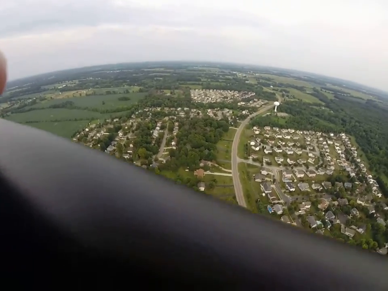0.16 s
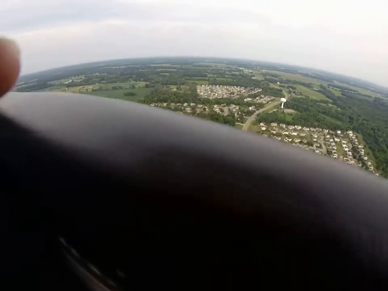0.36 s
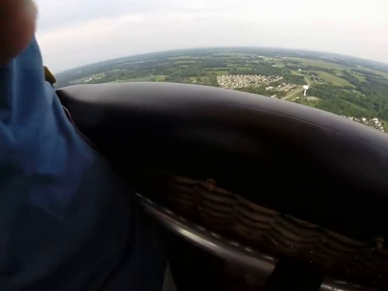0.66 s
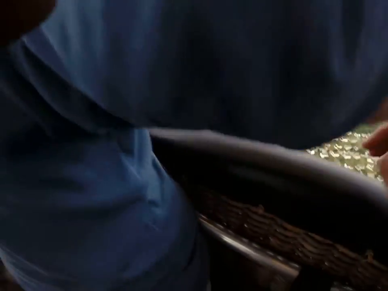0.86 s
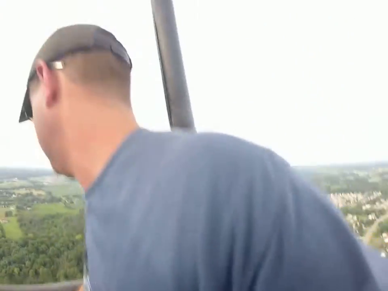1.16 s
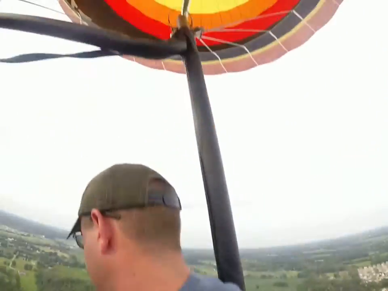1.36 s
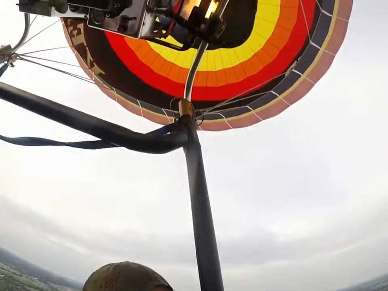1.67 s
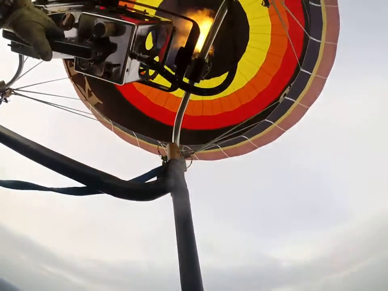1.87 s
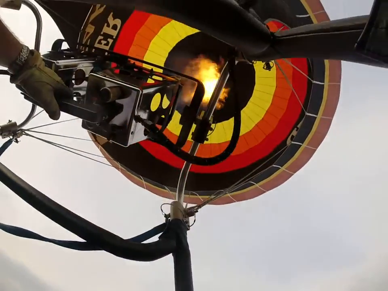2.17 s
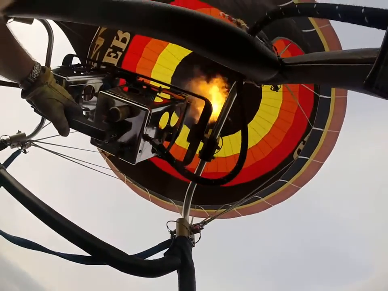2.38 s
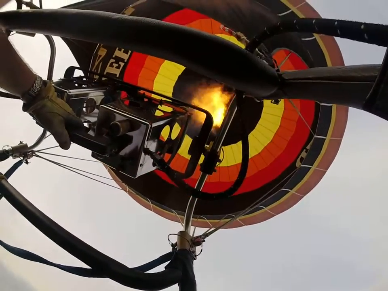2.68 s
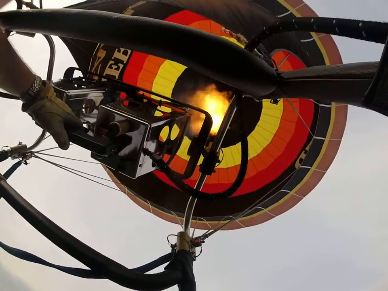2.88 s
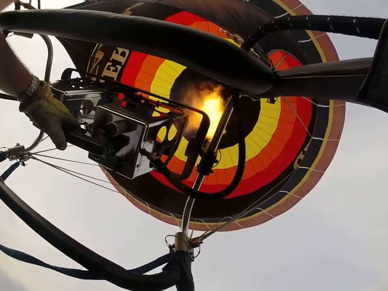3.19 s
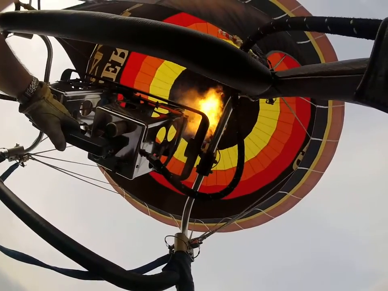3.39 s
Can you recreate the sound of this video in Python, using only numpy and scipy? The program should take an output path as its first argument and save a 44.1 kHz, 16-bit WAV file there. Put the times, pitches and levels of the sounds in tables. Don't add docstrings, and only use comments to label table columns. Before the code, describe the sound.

Hot-air balloon burner roars steadily, hiss growing over low rumble, with a few sharp handling knocks

```python
import sys
import numpy as np
from scipy import signal
from scipy.io import wavfile
from scipy.ndimage import uniform_filter1d

SR = 44100
rng = np.random.default_rng(int(sys.argv[2]) if len(sys.argv) > 2 else 0)


def file_out(sig):
    cols = np.atleast_2d(sig).T
    lim = np.clip(cols, -1, 1)
    pcm = np.round(lim * 32767).astype(np.int16)
    wavfile.write(sys.argv[1], SR, pcm)


def voltage_ratio(level):
    return 10 ** (np.asarray(level, float) / 20)


N = 156114

# (time [s], jet level [dB], pose [0 rim, 1 pilot, 2 tilting up, 3 under burner],
# closeness of basket and pilot [0-1], basket echo dip [Hz])
TURN = [(0, -27.5, 0.22, 0.83, 850), (.2, -28, 0.17, 0.78, 870), (.4, -28, .01, 0.6, 960),
        (.52, -28.5, 0.6, 0.69, 920), (.7, -25.5, 0.78, 0.83, 890), (.86, -24.5, 1.13, 1, 795),
        (1.0, -21.5, 1.47, 1, 820), (1.09, -20.5, 1.4, .6, 720), (1.2, -22.5, 2.4, 0.7, 694),
        (1.35, -22.5, 1.74, 0.39, 660), (1.7, -19, 1.91, 0.34, 583), (2.0, -17.5, 2.56, 0.36, 583),
        (2.2, -15.5, 2.8, 0.04, 570), (2.38, -15.5, 2.8, 0, 537), (2.62, -16, 4, 0.06, 555),
        (2.9, -15.5, 3.3, 0, 560), (3.2, -17, 2.72, 0.08, 550), (3.54, -15, 2.84, .3, 550)]


def jet():
    # (frequency [Hz], level [dB per Hz])
    from_rim = [(600, -9), (1800, -11.5), (3000, -13), (4500, -8), (7000, -7), (8300, -22), (11000, -17.5),
                (15500, -30)]
    beside_pilot = [(600, -28), (1800, -14), (3000, -4), (4500, -3.5), (7000, -4), (8500, -9.5),
                    (11000, -12), (15500, -20)]
    tilting_up = [(600, -22.5), (1700, -16), (2800, -17), (4300, -5.5), (6800, -8.5), (7800, -19.5),
                  (11000, -17), (15500, -28.5)]
    under_burner = [(600, -20), (1700, -23), (2700, -14), (4300, -7), (6500, -9.5), (7200, -16.5),
                    (11000, -20), (15500, -33.5)]
    t, hz = grid(size=1024)
    views = np.hstack([read(view, hz) for view in (from_rim, beside_pilot, tilting_up, under_burner)])
    field = views @ poses(t) + housing(t, hz)
    field = field - 40 * (hz < 200)
    level_db = curve(TURN, np.arange(N) / SR)[0]
    return voltage_ratio(level_db) * noise(field, patchy_db=1.26, flicker_db=0.57)


def flame():
    # (time [s], level [dB])
    swell = [(0, -26), (.25, -22), (.45, -22.5), (.65, -19.5), (.82, -20), (.93, -21.5), (1.03, -19),
             (1.2, -24.5), (1.4, -21), (1.6, -23), (1.8, -20), (2.06, -18.5), (2.2, -19.5), (2.5, -22.5),
             (2.8, -20.5), (3.12, -23.5), (3.26, -19.5), (3.54, -23.5)]
    # (frequency [Hz], level [dB per Hz])
    rumble = [(8.8, -50), (15, -14.5), (69, -5), (162, -1), (306, -12), (345, -13.5), (389, -29.5),
              (439, -27.5), (560, -66), (730, -64), (1230, -120)]
    shelter_db, shelter_hz = -4.5, 117
    t, hz = grid(size=2048)
    _, _, close, dip_hz = curve(TURN, t)
    field = read(rumble + [(1500, -71)], hz) + dip(hz, dip_hz)
    field = field + shelter_db * close * bump(hz, 0, 2 * shelter_hz)
    level_db = curve(swell, np.arange(N) / SR)[0]
    return voltage_ratio(level_db) * noise(field, patchy_db=.2, flicker_db=0.32)


def basket():
    # (frequency [Hz], level [dB per Hz])
    reflected = [(300, -1.5), (500, -4), (850, -12.5), (1300, -9.5), (1750, -17), (2300, -18), (3300, -25),
                 (6000, -60)]
    t, hz = grid(size=1024)
    field = read([(100, -45)] + reflected + [(15000, -60)], hz) + housing(t, hz)
    close = np.clip(curve(TURN, np.arange(N) / SR)[2], 0, 2)
    return voltage_ratio(-28) * close * noise(field, patchy_db=.4, flicker_db=0.7)


def ticks():
    tick_times = [.446, .6388, .6742, .8771, 1.0535, 1.1152]
    # (peak [dB], pitch [Hz], brightness [dB per octave], rise [s], 60 dB ring time [s])
    touches = [
        (-15, 2300, -3, 0.00039, .003),
        (-11, 990, -25, .0007, .016),
        (-6, 1950, -1, .0005, .0045),
        (2.5, 1420, -1, .0005, .0065),
        (-15, 1300, -14, .0005, .006),
        (1, 1320, -15, 0.00012, 0.0026),
    ]
    # (multiple of pitch, level [dB], share of ring time)
    shell = [(1, 0, 1), (1.7, -1, .9), (2.4, -9, .7), (3.2, -14, .6), (4.0, -7, .7), (4.7, -13, .6)]
    bounce_s, bounce = .0011, .3
    out, t = np.zeros(N), np.arange(600) / SR
    for s, (db, hz, bright_db, rise, t60) in zip(tick_times, touches):
        ring = np.zeros(len(t))
        for m, mode_db, share in shell:
            fade_db = mode_db + bright_db * np.log2(m) - 60 * t / (t60 * share)
            onset = 1 - np.exp(-(t * m / rise) ** 2)
            ring = ring + voltage_ratio(fade_db) * np.sin(2 * np.pi * hz * m * t) * onset
        ring = ring - bounce * np.interp(t - bounce_s, t, ring, left=0)
        out[round(s * SR):][:len(t)] += voltage_ratio(db) * ring / abs(ring).max()
    return out


def housing(t, hz):
    # (centre [Hz], width [Hz], lift [dB] at rim, by pilot, tilting up, under burner)
    resonances = [(1194, 226, 8, -3.5, 5.5, 5), (2250, 520, 6, 3, 10.5, 1),
                  (2560, 310, 0.5, -0.5, -1.5, -5.5), (3396, 410, 11.5, 1, 5.5, 0),
                  (4064, 600, 9.5, 0, 7.5, 6), (4646, 440, 5, 8, 1.5, 5.5), (5280, 350, 6, 0.5, -2.5, -1),
                  (5550, 300, 0, -8, 2.5, 4), (6250, 690, -1.5, 2, 1.5, 3.5), (7370, 570, 1, 0.5, 4, -1),
                  (8360, 380, 5, 3, 2.5, 2), (9300, 650, 4, 6, -2, -2.5), (10350, 1200, 4.5, 1, 2, 6),
                  (12800, 2200, 1.5, 3, 1, 4)]
    # (time [s], pitch [Hz], lift [dB])
    gap = [
        (.72, 2340, 0.5),
        (.82, 2470, 7),
        (.95, 2680, 9),
        (1.04, 2440, 6),
        (1.14, 2250, -0.5),
    ]
    gap_width_hz, trough_ratio = 300, .73
    gap_hz, gap_db = curve(gap, t)
    song = bump(hz, gap_hz, gap_width_hz) + bump(hz, gap_hz / 2, gap_width_hz)
    song = song - 0.47 * bump(hz, trough_ratio * gap_hz, gap_width_hz)
    colour = dip(hz, curve(TURN, t)[3]) + gap_db * song
    for f, width, *lift_db in resonances:
        colour = colour + (lift_db @ poses(t)) * bump(hz, f, width)
    return colour


def dip(hz, centre_hz):
    depth_db, width_hz = -13, 80
    return depth_db / (1 + (2 * (hz - centre_hz) / width_hz) ** 2)


def bump(hz, centre_hz, width):
    return 1 / (1 + (2 * (hz - centre_hz) / width) ** 4)


def poses(t):
    pose = np.clip(curve(TURN, t)[1], 0, 3)
    return np.clip(1 - abs(pose - np.arange(4)[:, None]), 0, 1)


def noise(field_db, patchy_db, flicker_db):
    bins, frames = field_db.shape
    a, b, patches, wide = rng.standard_normal((frames, bins, 4)).T
    patches = evened(uniform_filter1d(uniform_filter1d(patches, size=10, axis=0), size=12, axis=1))
    wide = evened(uniform_filter1d(uniform_filter1d(wide, size=150, axis=0), size=3, axis=1))
    shape = voltage_ratio(field_db)
    shape = shape / np.sqrt((shape ** 2).sum(0))
    shape = shape * voltage_ratio(patchy_db * patches + flicker_db * wide)
    sound = signal.istft((a + 1j * b) * shape, nperseg=2 * bins - 2, noverlap=3 * (bins - 1) // 2)[1]
    return evened(sound[:N])


def evened(x):
    return x / np.sqrt(np.mean(x ** 2) + 1e-20)


def read(points, hz):
    f, value = np.transpose(points)
    return np.interp(np.log(hz + 1), np.log(f + 1), value)


def curve(table, t):
    rows = np.transpose(table)
    return [np.interp(t, rows[0], row) for row in rows[1:]]


def grid(size):
    hop = size // 4
    return np.arange(N // hop + 5) * hop / SR, np.fft.rfftfreq(size, 1 / SR)[:, None]


def gain_control():
    # (time [s], drop [dB])
    drops = [
        (0.869, -3),
        (1.099, -5),
    ]
    fall_s, recover_s = 0.003, 0.3
    t = np.arange(N) / SR
    duck_db = np.zeros(N)
    for s, db in drops:
        fall = np.clip((t - s) / fall_s, 0, 1)
        duck_db = duck_db + db * fall * np.exp(-np.maximum(t - s, 0) / recover_s)
    return voltage_ratio(duck_db)


def scene():
    roar = flame() + jet() + basket()
    mono = roar * gain_control() + ticks()
    return np.array([mono, mono])


def roll_off(x):
    return signal.sosfilt(signal.butter(12, 15550, fs=SR, output="sos"), x)


def record(dry):
    ceiling, edge_hz = .93, 15350
    clipped = np.clip(dry, -ceiling, ceiling)
    low_pass = signal.firwin(511, edge_hz, window=("kaiser", 9), fs=SR)
    mix = signal.oaconvolve(clipped, low_pass[None], "same")
    return roll_off(mix)


dry = scene()
out = record(dry)
file_out(out)
```